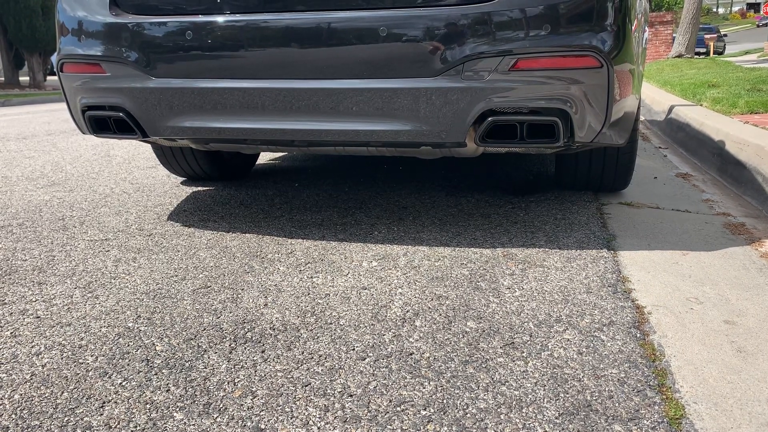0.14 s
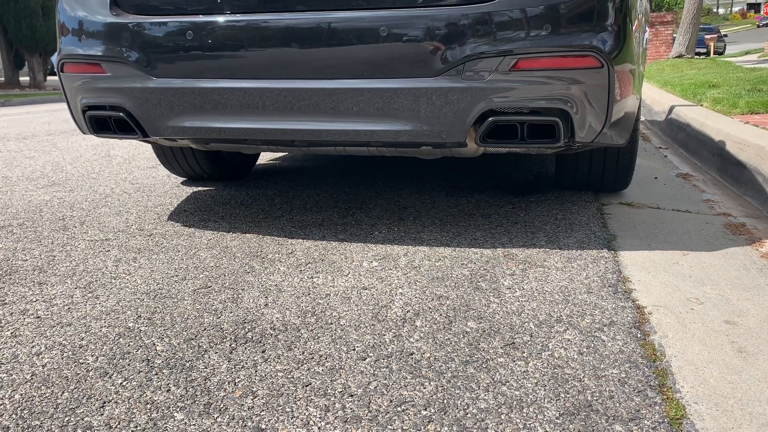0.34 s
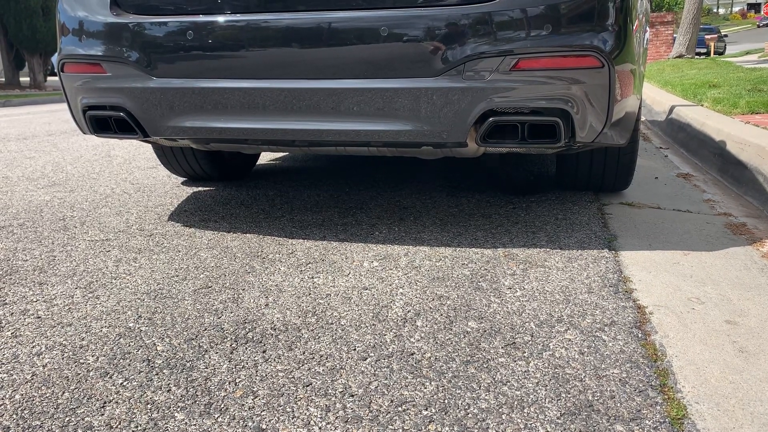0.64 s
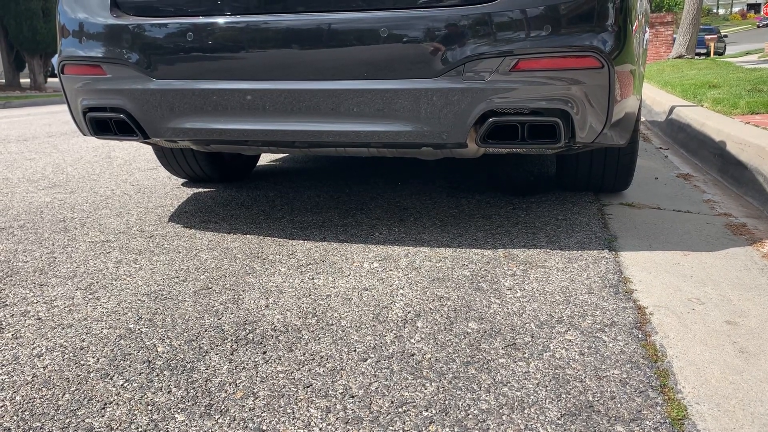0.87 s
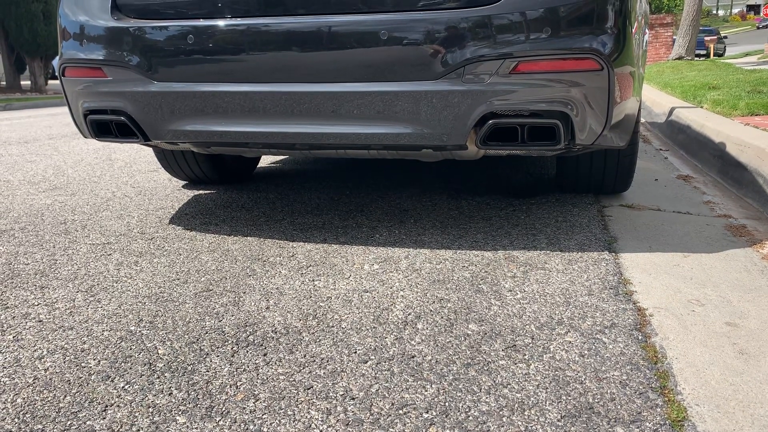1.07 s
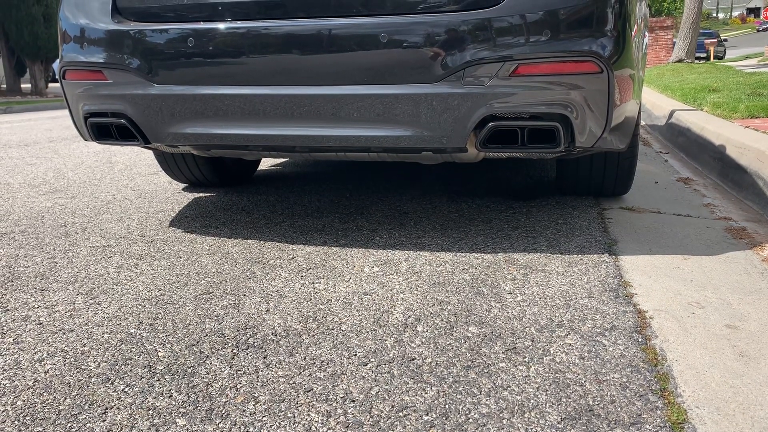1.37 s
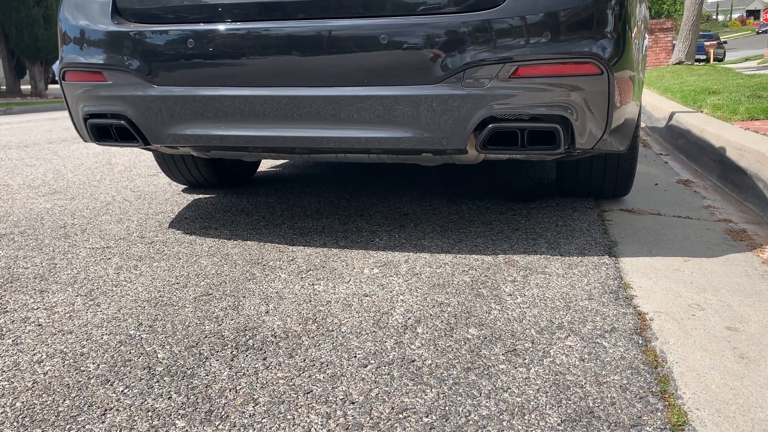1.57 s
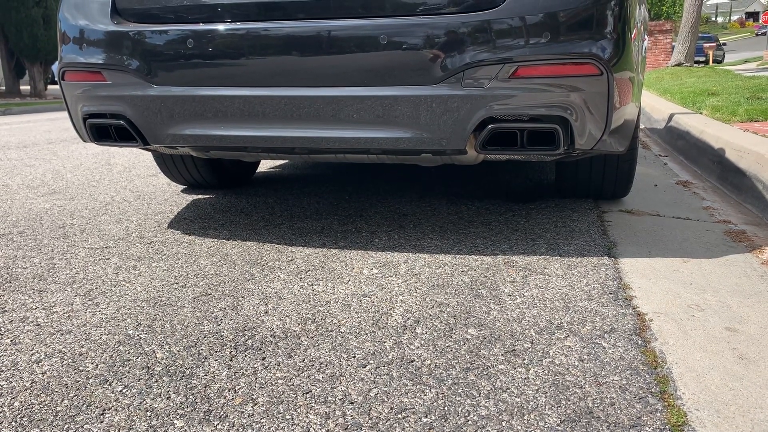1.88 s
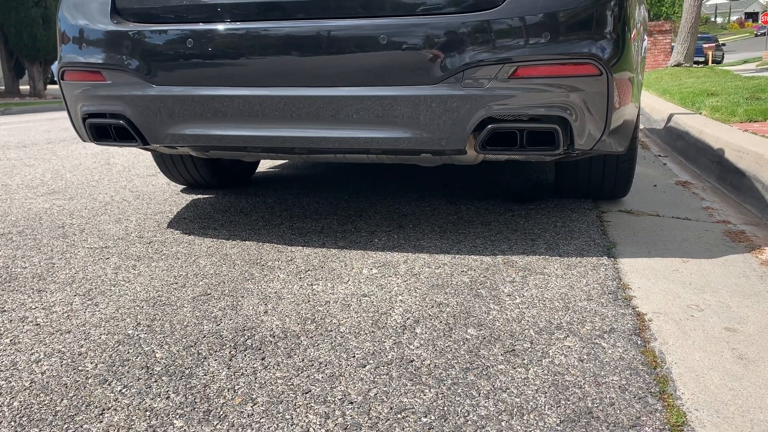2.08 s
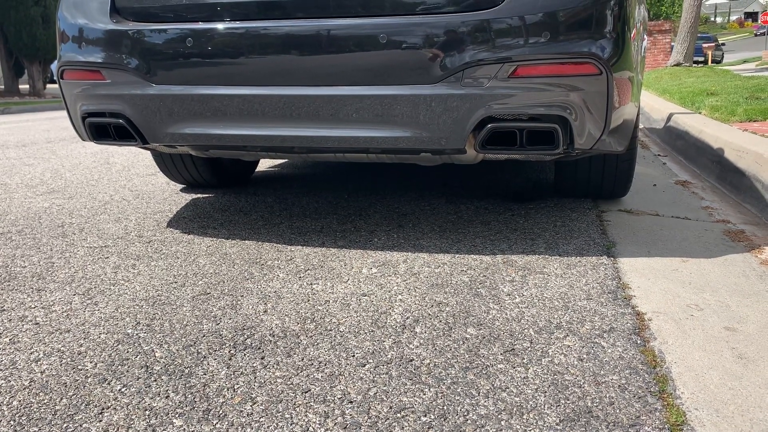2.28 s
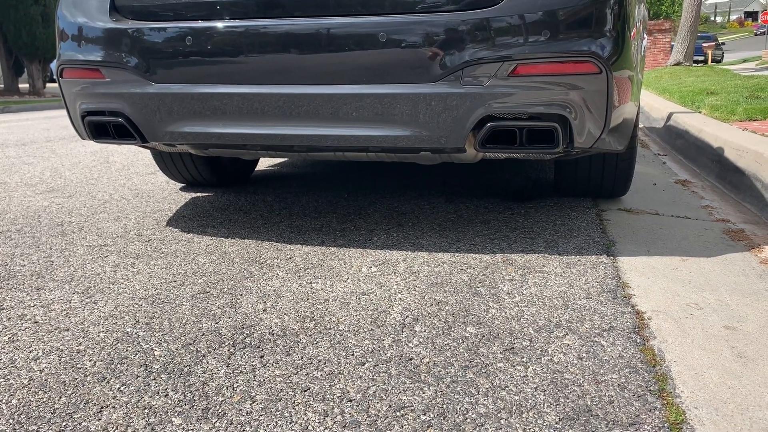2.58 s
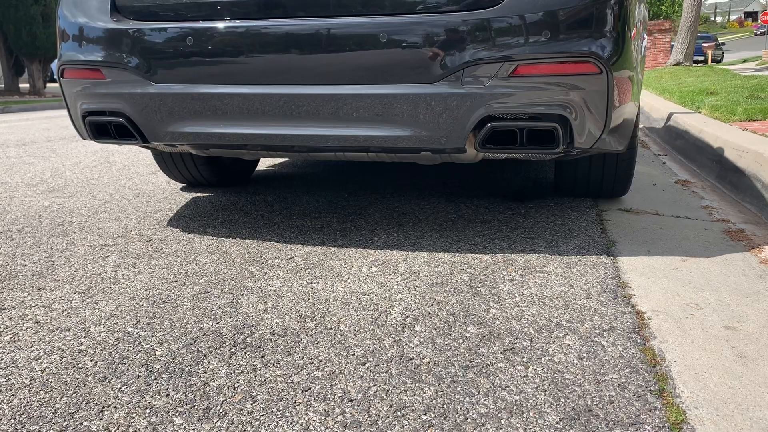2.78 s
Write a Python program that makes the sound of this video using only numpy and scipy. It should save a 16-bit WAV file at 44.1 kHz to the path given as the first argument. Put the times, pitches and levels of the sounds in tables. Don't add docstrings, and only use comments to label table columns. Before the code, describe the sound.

Close stereo microphone behind a parked car outdoors: the exhaust bangs, spits and crackles for a second, the engine note slides down, then settles into a low burbling idle with faint metal ticks.

```python
import sys
import numpy as np
from scipy import signal
from scipy.fft import rfft, irfft, next_fast_len
from scipy.io import wavfile
from scipy.ndimage import map_coordinates

SR = 44100
rng = np.random.default_rng(int(sys.argv[2]) if len(sys.argv) > 2 else 0)


def persist_wave(psi):
    counts = np.round(np.clip(psi, -1, 1) * 32767).astype(np.int16)
    wavfile.write(sys.argv[1], SR, np.atleast_2d(counts).T)


def to_linear_factor(level_db):
    exponent = np.asarray(level_db, float) / 20
    return 10 ** exponent


N = 129213
TIME = np.arange(N) / SR


def unit(x):
    return x / np.sqrt(np.mean(x ** 2) + 1e-20)


def along(points, hz):
    f, v = np.transpose(points)
    return np.interp(np.log(hz + 1), np.log(f + 1), v)


def curves(rows):
    s, *cols = np.transpose(rows)
    return [np.interp(TIME, s, c) for c in cols]


def wobble(rate):
    knots = rng.standard_normal(int(N * 200 / SR) + 4)
    return map_coordinates(knots, [TIME * min(rate, 199)])


def filtered(x, response):
    m = next_fast_len(N + SR // 2)
    return irfft(rfft(x, m) * response(np.fft.rfftfreq(m, 1 / SR)), m)[..., :N]


def low_cut(f, hz):
    return 1 / (1 + (hz / (f + 1)) ** 4)


def noise(spectrum):
    colour = lambda f: to_linear_factor(along(spectrum, f)) * low_cut(f, spectrum[0][0])
    return unit(filtered(rng.standard_normal(N), colour))


# t/s, firing rate f/Hz, even firing level/dB,
# cylinder imbalance level/dB, pipe rumble level/dB
ENGINE = [(0, 236.3, -32, -36, -31), (.2, 244, -43, -28, -26), (.5, 237.8, -60, -24.5, -25.5),
          (.82, 238.3, -60, -26, -24), (.95, 222.9, -34.5, -22, -24.5), (1.104, 202.6, -30, -26, -26),
          (1.344, 173.8, -29.5, -23.5, -27), (1.512, 152.4, -19, -25.5, -28.5),
          (1.686, 132.9, -23, -27, -32), (1.932, 100.5, -15, -31.5, -33), (2.082, 79.8, -21, -31.5, -37.5),
          (2.2, 66.1, -30, -26, -39), (2.3, 60.68, -32, -40, -41.5), (2.36, 62, -27, -29, -38),
          (2.5, 61.9, -28, -37, -37.5), (2.62, 61.73, -28, -26.5, -38.5), (2.75, 58.87, -33.5, -28.5, -40),
          (2.93, 57.6, -34, -25, -38.5)]
# t/s, overtone level/dB
FUEL = [
    (0, -25.5),
    (1.3, -27.5),
    (1.7, -36),
    (2.05, -37),
    (2.15, -24.5),
    (2.24, -31.5),
    (2.34, -22.5),
    (2.5, -21.5),
    (2.66, -26.5),
    (2.93, -28.5),
]
CYLINDERS = 8


def engine():
    firing_hz, even_db, uneven_db, rumble_db = curves(ENGINE)
    fuel_db, = curves(FUEL)
    cycle = 2 * np.pi * np.cumsum(firing_hz * (1 + 0.00088 * wobble(25.1))) / SR / CYLINDERS
    firing = CYLINDERS * cycle
    puff = (1 + np.cos(firing)) / 2
    boom = to_linear_factor(even_db + 2.5 + 0.39 * wobble(25.8)) * np.sin(firing)
    chuffs = to_linear_factor(fuel_db - 12) * chuff(puff)
    return (boom + coasting_orders(cycle, firing_hz) + chuffs + pulse_orders(cycle, fuel_db, uneven_db)
            + to_linear_factor(rumble_db) * rumble(puff) + hiss(puff))


def order(k, db, cycle):
    return to_linear_factor(db + 0.8 * wobble(9.05)) * np.sin(k * cycle + rng.uniform(0, 2 * np.pi))


# f/Hz, width/Hz, level/dB
PIPE = [(62, 60, -1), (118.2, 49.6, 3), (157.8, 34.8, 0), (240, 73, -6), (343.4, 25.2, -2), (436, 33, -7.5),
        (495, 45, -4.5), (632, 104, -13), (687, 68, -11), (852.5, 33.6, -11), (961, 61, -13),
        (1264, 89, -22), (1788, 71, -18.5), (2366, 200, -27)]


def pipe(f):
    peaks = 0
    for k, (centre, width, db) in enumerate(PIPE):
        damping = 1j * f * width
        peaks = peaks + (-1) ** k * to_linear_factor(db) * damping / (centre ** 2 - f ** 2 + damping)
    return peaks * low_cut(f, 42)


# multiple of the cycle, level/dB
OVERTONES = [
    (13, -8),
    (16, -1.5),
    (19, -8.5),
    (20, -10),
    (21, -9),
    (22, -16),
    (24, -9.5),
]
# multiple of the cycle, level/dB
LOPE = [(2, -2), (3, 0), (4, -5), (5, -2), (6, -4.5), (7, -7.5), (9, -30.5), (10, -15), (11, -4.5),
        (12, -10)]


def pulse_orders(cycle, fuel_db, uneven_db):
    overtones = sum(order(k, db, cycle) for k, db in OVERTONES)
    lope = sum(order(k, db, cycle) for k, db in LOPE)
    pulses = to_linear_factor(fuel_db + 3.5) * overtones + to_linear_factor(uneven_db + 2.5) * lope
    return filtered(pulses, lambda f: pipe(f) * np.abs(pipe(f)) ** 0.6)


# multiple of the cycle, level/dB
UNEVEN = [(13, -21), (14, -34), (15, -20), (17, -23), (18, -33), (19, -18), (21, -25), (22, -32), (23, -31),
          (25, -21), (27, -26), (29, -25), (33, -28)]
# f/Hz, level/dB
TAIL = [(150, -14), (255, -4), (345, -4), (395, -12), (490, 0), (570, -5), (720, -12), (1000, -25)]


def coasting_orders(cycle, firing_hz):
    coast_s, settle_s, misfire_db, fade_db_per_octave = 0.98, 0.03, -18, 14
    locked_db = misfire_db / (1 + np.exp((TIME - coast_s) / settle_s))
    locked_db = locked_db + fade_db_per_octave * np.log2(firing_hz / firing_hz[0])
    return sum(to_linear_factor(locked_db + along(TAIL, k * firing_hz / CYLINDERS)) * order(k, db, cycle)
               for k, db in UNEVEN)


def rumble(puff):
    gusts = rng.standard_normal(N) * (1.5 + puff ** 3 * to_linear_factor(2.4 * wobble(55))) * to_linear_factor(0.4 * wobble(25.33))
    return unit(filtered(gusts, lambda f: pipe(f) * (0.33 + 0.74 * low_cut(f, 230))))


def chuff(puff):
    gas = rng.standard_normal(N) * puff ** 2 * to_linear_factor(1.5 * wobble(50))
    return unit(filtered(gas, lambda f: pipe(f) / (1 + (320 / (f + 1)) ** 10) / (1 + (f / 600) ** 8)))


# t/s, level/dB
FLOW = [(0.0, -29), (0.08, -43), (.19, -36), (.23, -35.5), (0.31, -32.5), (0.36, -35.5), (0.39, -31),
        (0.51, -41.5), (0.62, -27), (0.7, -32), (0.76, -34.5), (0.82, -42), (.88, -32), (0.96, -33),
        (1.15, -37), (1.43, -42.5), (2.1, -51.5), (2.9, -66)]
# f/Hz, level/dB per Hz
HISS = [(900, 7.5), (1300, 8.5), (2600, 2), (3000, -3), (5600, -4.5), (8000, -3.5), (11500, -7.5),
        (15700, -26)]


def hiss(puff):
    flow_db, = curves(FLOW)
    sway_db = 0.9 * (wobble(13.1) + wobble(21.86) + wobble(45.47))
    return to_linear_factor(flow_db + 3.0) * unit(noise(HISS) * (2.5 + puff) * to_linear_factor(sway_db))


# t/s, thump level/dB, pipe ring level/dB, crack level/dB
BANGS = [(.000, -7.5, -7, -16), (.016, -5, -7, -40), (0.051, -43, -21, -48), (0.123, -17, -25, -39),
         (.206, -14, -22, -55), (0.246, -16, -24, -59), (0.298, -5, -12.5, -60), (.352, -16, -11, -30),
         (0.374, -7, -12, -24), (0.388, -28, -3, -24), (0.395, -36, -14, -36), (0.409, -15, -7.5, -31.5),
         (.419, -28, -16.5, -37), (.486, -10, -29, -33), (0.5, -10.5, -34, -38), (0.558, -22, -12, -34),
         (.575, -25, -16, -23.5), (0.592, -6.5, -7.5, -26), (.608, -29, -12.5, -25), (.62, -25, -12, -24),
         (.627, -1, -4.5, -31), (.641, -13, -13, -17.5), (0.655, -32, -2, -18.5), (.672, -6, -3.5, -18.5),
         (0.69, -7, -9, -19.5), (.705, -6, -9, -25), (.725, -14, -5.5, -26), (.740, -12, -11, -47),
         (0.807, -28, -36, -30), (.878, -10, -46, -33), (0.921, -9, -35, -57), (0.934, -18, -32, -56),
         (0.954, -26, -40, -55), (0.991, -15, -34, -58)]
# f/Hz, level/dB, t60/s
THUMP = [
    (111.5, 0.5, 0.15),
    (79, -14.5, 0.15),
    (146.4, -0.5, 0.074),
    (213.5, -11.5, 0.15),
]
# f/Hz, level/dB, t60/s
RING = [
    (521, 1.5, 0.051),
    (338.7, -5, 0.093),
    (591, -12.5, 0.11),
    (260, -2.5, 0.057),
    (863, -18, 0.18),
]
# f/Hz, level/dB per Hz
CRACK = [
    (700, -1),
    (1000, -7),
    (1300, 9),
    (2700, 0),
    (3300, -9),
    (6000, -15.5),
    (8000, -12),
    (16000, -24),
]


def bangs():
    out, crack, t = np.zeros(N + SR), np.zeros(N + SR), np.arange(SR // 5) / SR
    scatter_db, detune, slip = 1.3, 0.035, 0.4
    for s, thump_db, ring_db, crack_db in BANGS:
        modes = [(hz, db + thump_db, t60, 0.006) for hz, db, t60 in THUMP]
        modes += [(hz, db + ring_db, t60, 0.0012) for hz, db, t60 in RING]
        start = round(s * SR)
        here = slice(start, start + len(t))
        for hz, db, t60, rise_s in modes:
            size, tune, turn = rng.standard_normal(3)
            swell = to_linear_factor(db + scatter_db * size - 60 * t / t60) * (1 - np.exp(-t / rise_s))
            out[here] += swell * np.sin(2 * np.pi * hz * (1 + detune * tune) * t + slip * turn)
        crack[here] += to_linear_factor(crack_db + 4 - 60 * t / 0.068) * (1 - np.exp(-t / 0.0023))
    spitting = to_linear_factor(1.8 * wobble(190))
    return out[:N] + crack[:N] * noise(CRACK) * spitting


# t/s, level/dB, f/Hz, relative width, t60/s
TICKS = [(2.166, -36, 9015, 0.97, 0.043), (2.170, -49, 4714, 0.16, .04), (2.453, -45.5, 4700, 0.16, 0.039),
         (2.453, -42, 2350, 0.15, 0.036), (2.714, -49.5, 4500, 0.18, 0.043), (.005, -15, 1680, 0.4, 0.023),
         (.3875, -15.5, 2470, 0.41, .012), (.397, -20, 2400, .3, 0.017), (.411, -27, 2498, 0.33, 0.016),
         (.642, -16, 1500, 0.42, 0.011), (.654, -20, 2500, 0.59, .01), (.675, -17, 2850, 0.28, 0.015),
         (.682, -19, 2300, .5, 0.012), (.692, -12.5, 4500, .4, 0.0086), (.697, -17.5, 3400, 0.21, 0.017),
         (.707, -15, 2540, 0.65, 0.018)]


def ticks():
    out = np.zeros(N)
    for s, db, hz, width, t60 in TICKS:
        t = TIME - s
        envelope = to_linear_factor(db - 60 * np.abs(t) / np.where(t > 0, t60, t60 / 3.9))
        band = lambda f: np.exp(-((f - hz) / (width * hz)) ** 2)
        puff = unit(filtered(rng.standard_normal(N), band))
        out += envelope * (np.sin(2 * np.pi * hz * t) + 0.64 * puff)
    return out


# f/Hz, level/dB per Hz
STREET = [(900, 3), (2550, -1.5), (2950, -13), (4400, -4), (5900, -18), (7100, -2.5), (11500, -16.5),
          (14000, -45)]


def street():
    return to_linear_factor(-49.5 + 0.24 * wobble(3.62)) * noise(STREET)


# f/Hz, lag of the left port/radians
LAG = [
    (500, 0),
    (1300, 1),
    (1900, 2.6),
    (2600, 5.3),
    (6100, 6.3),
    (8600, 9.42),
    (13450, 15.7),
    (15300, 18.85),
]
# f/Hz, correlation
ALIKE = [
    (150, .988),
    (300, .75),
    (800, .7),
    (1900, .3),
    (4500, .45),
    (6500, .7),
    (8300, .95),
    (15000, .95),
]


def ports(x):
    t = np.arange(SR // 5) / SR
    tail = rng.standard_normal(len(t)) * to_linear_factor(-60 * t / 0.16)
    scattered = signal.fftconvolve(x, tail / np.linalg.norm(tail))[:N]

    def spread(f):
        angle = np.arccos(np.clip(along(ALIKE, f), 0, 1)) / 2
        return np.array([np.cos(angle), np.sin(angle)]) * (f < 15800)

    mid, side = filtered(np.array([x, scattered]), spread)
    lag = lambda f: np.exp(0.5j * np.interp(f, *np.transpose(LAG)) * [[-1], [1]])
    balance = to_linear_factor([[-0.2], [0.2]])
    return filtered(np.array([mid + side, mid - side]) * balance, lag)


def scene():
    return ports(engine() + bangs() + ticks() + street())


def roll_off(x):
    return signal.sosfilt(signal.butter(12, 17100, fs=SR, output="sos"), x)


def record(dry):
    ceiling = 0.97
    mix = dry / (1 + np.abs(dry / ceiling) ** 6) ** (1 / 6)
    return roll_off(mix)


dry = scene()
out = record(dry)
persist_wave(out)
```